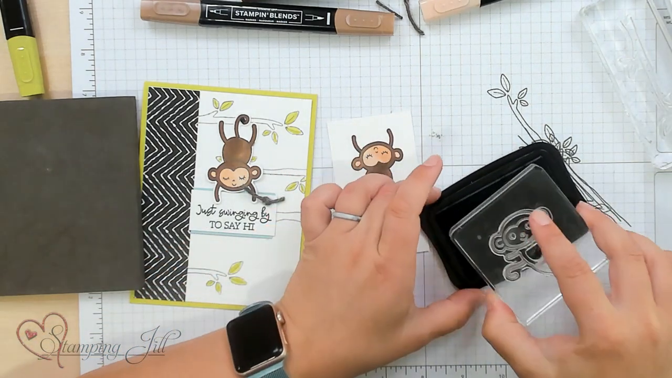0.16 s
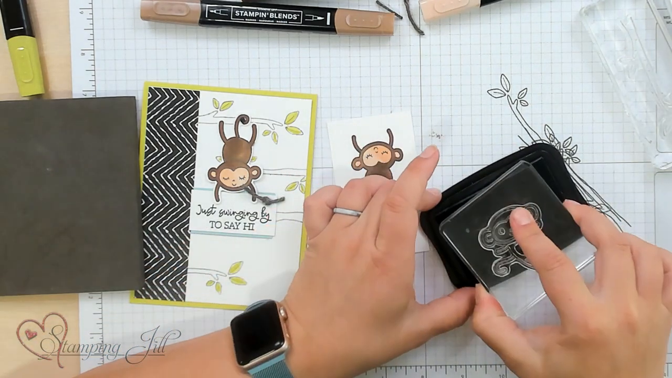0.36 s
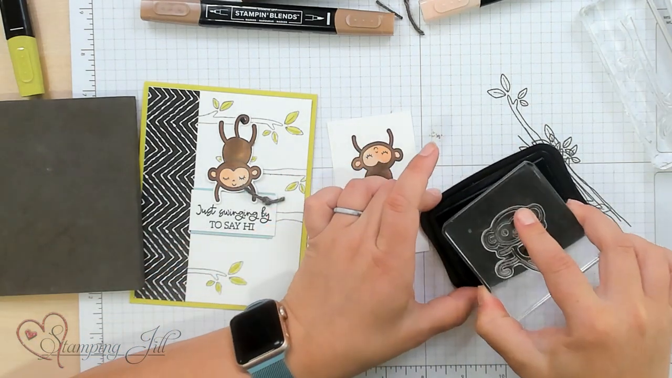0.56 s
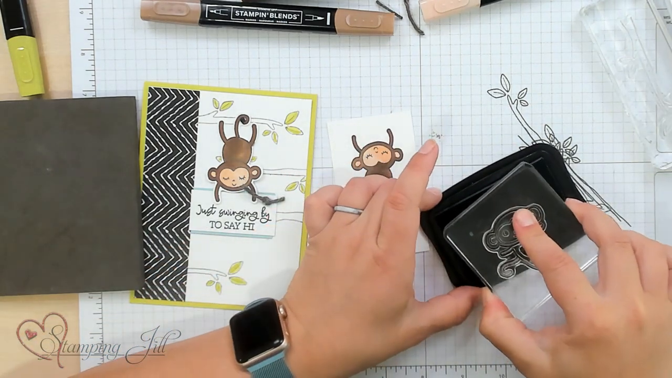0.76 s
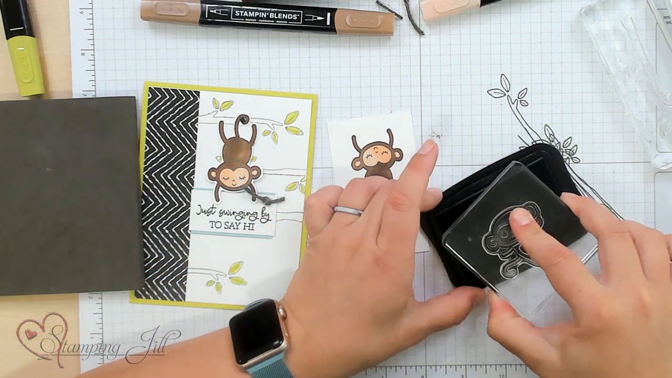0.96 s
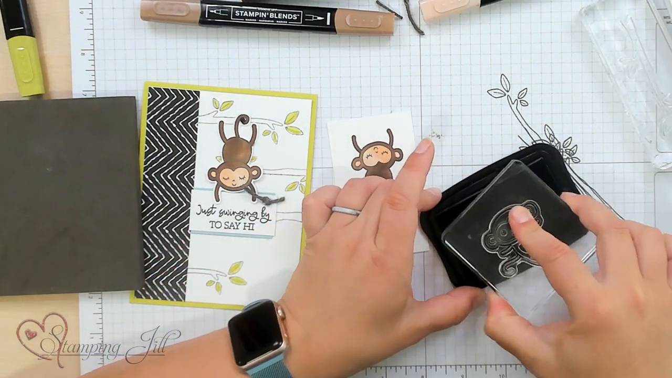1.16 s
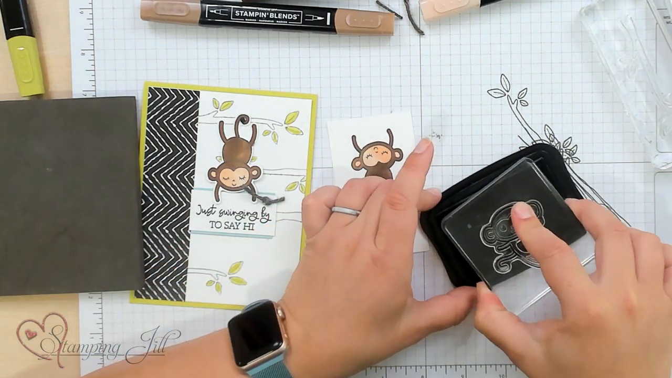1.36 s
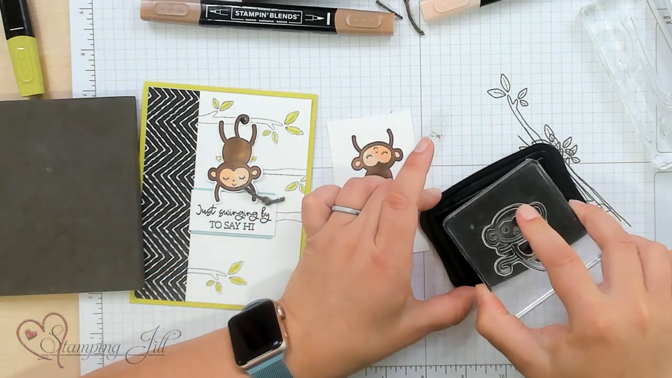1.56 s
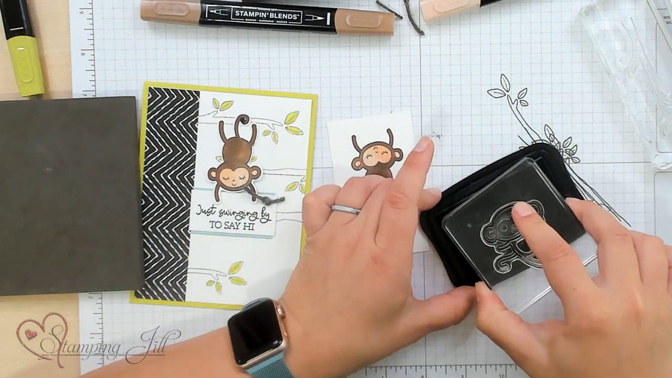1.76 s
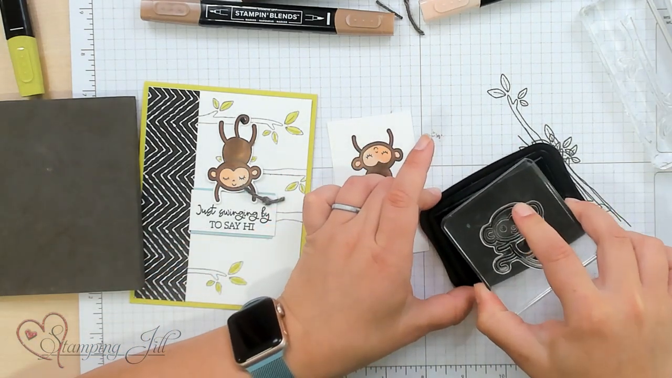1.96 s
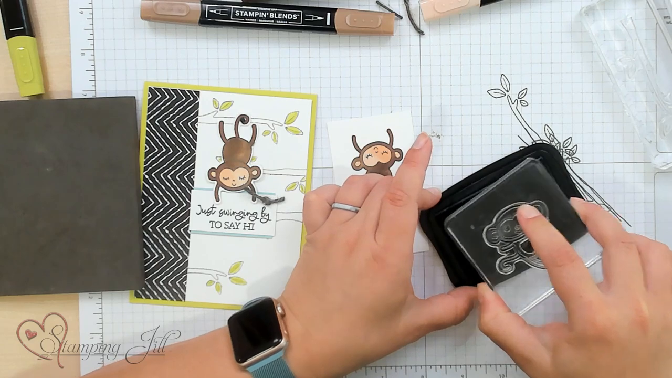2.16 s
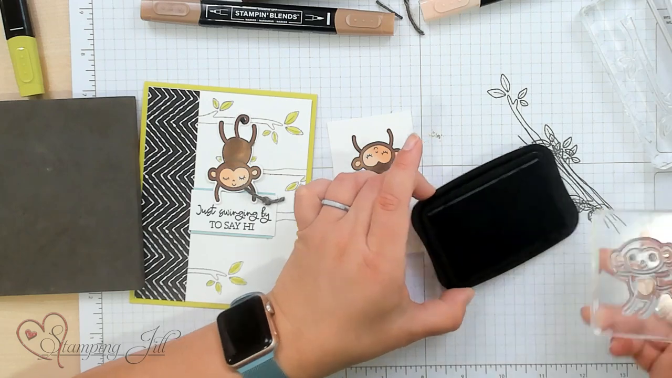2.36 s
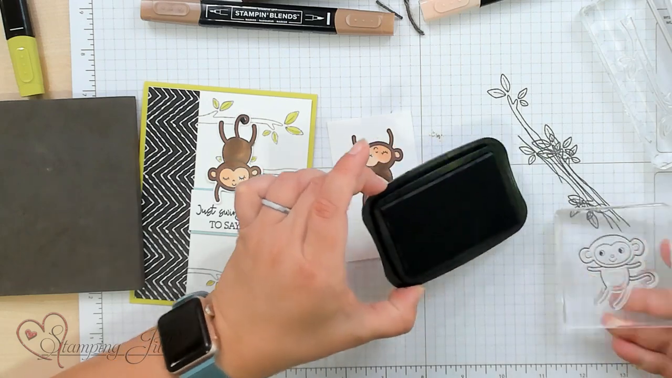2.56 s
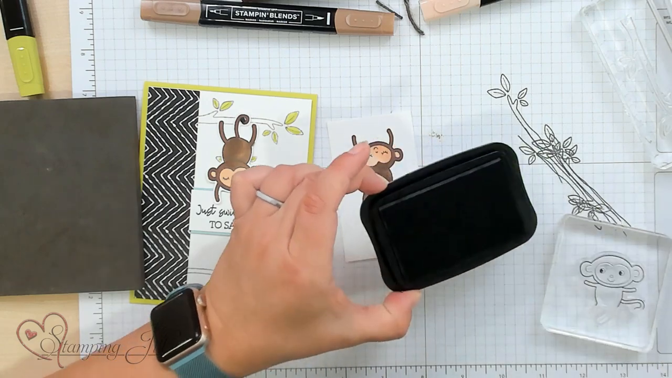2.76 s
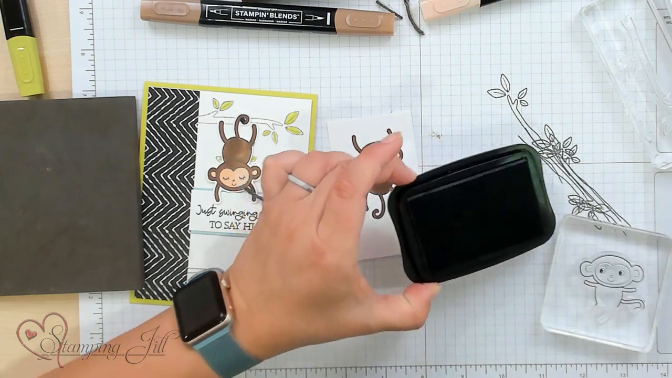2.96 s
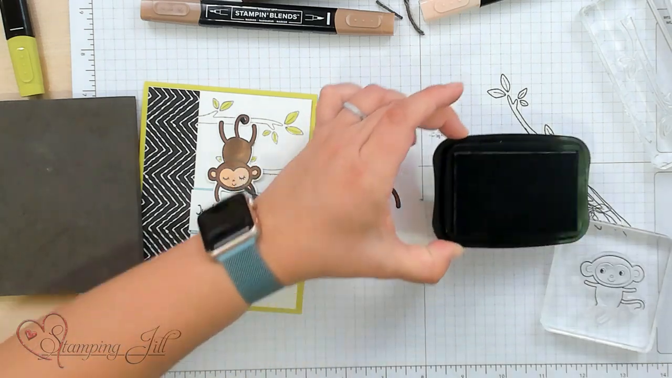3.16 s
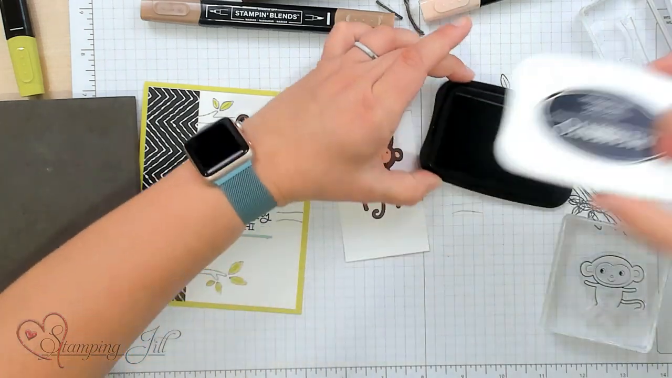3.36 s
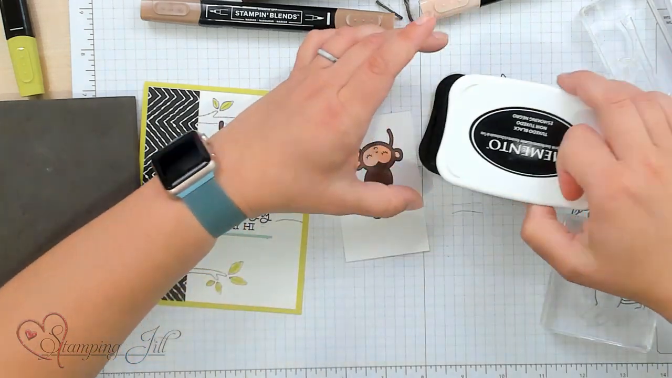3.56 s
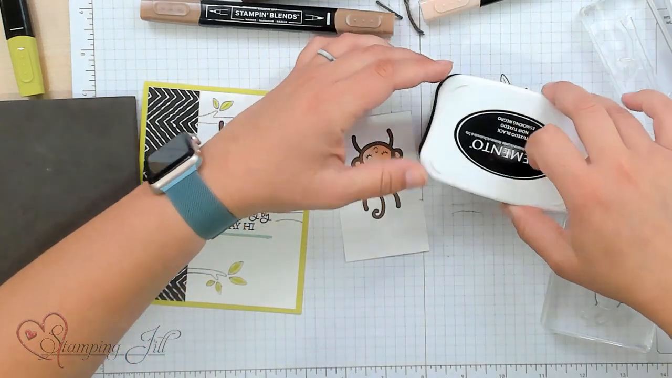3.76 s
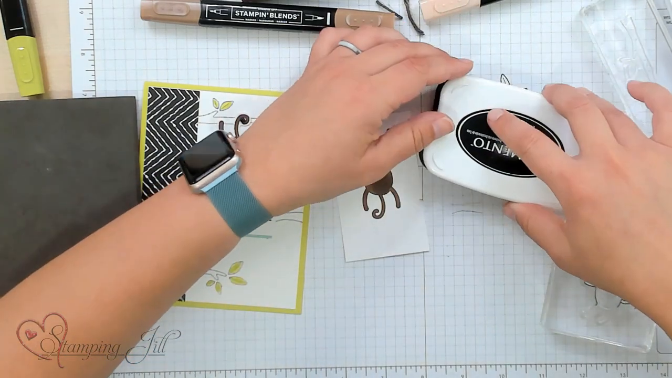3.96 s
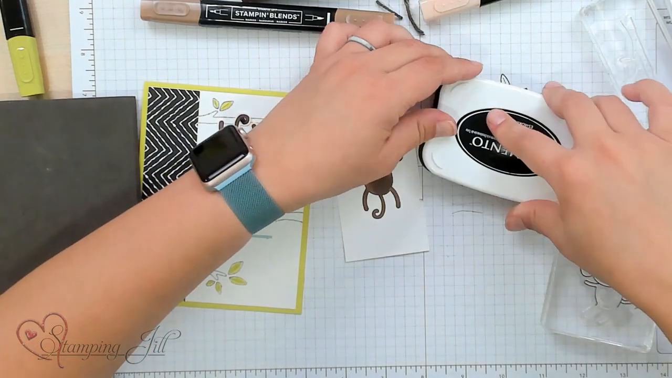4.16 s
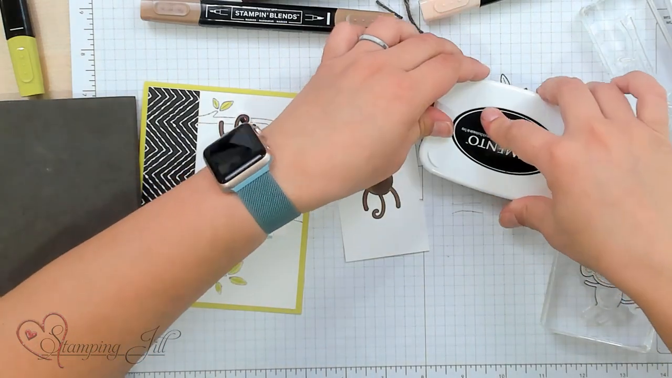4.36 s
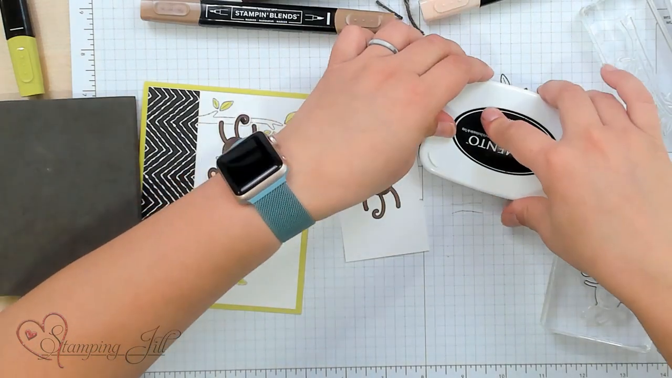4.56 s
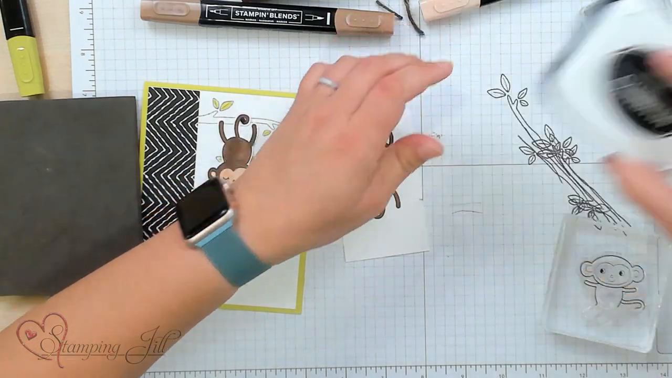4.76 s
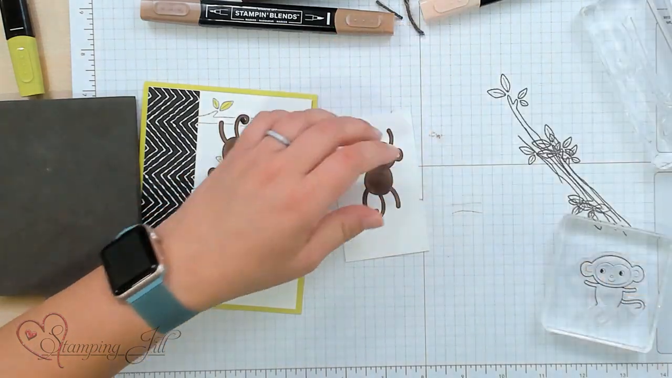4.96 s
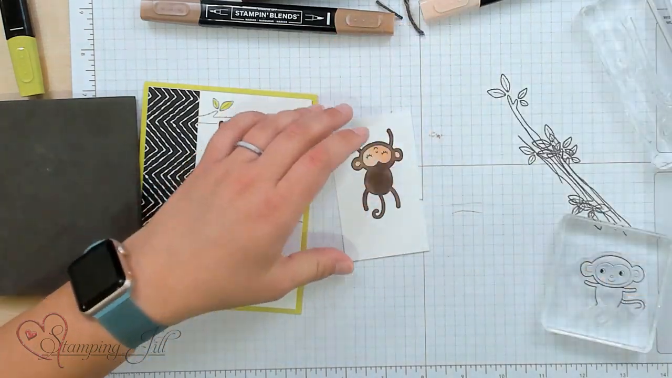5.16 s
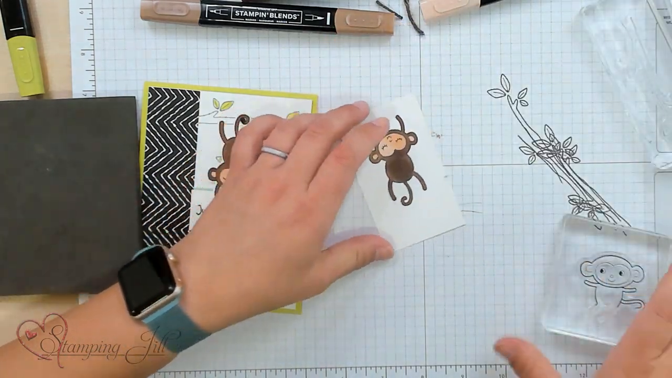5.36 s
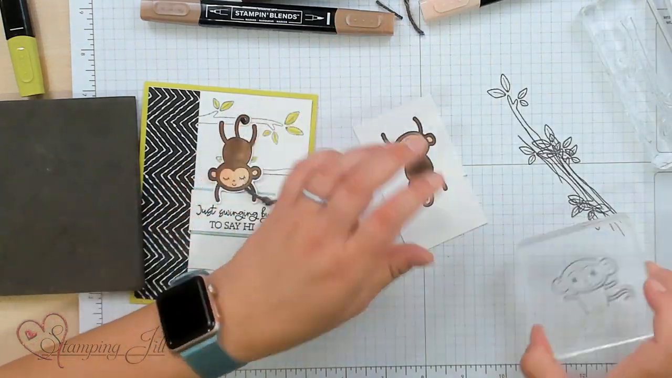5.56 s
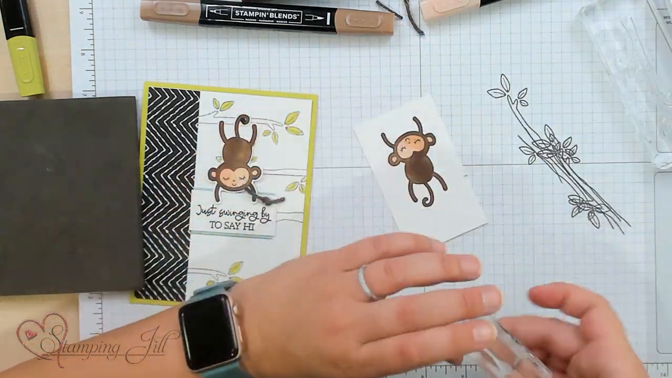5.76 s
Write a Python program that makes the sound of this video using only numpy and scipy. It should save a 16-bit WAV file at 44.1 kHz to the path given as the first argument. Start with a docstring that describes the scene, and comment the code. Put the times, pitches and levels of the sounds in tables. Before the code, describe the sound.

A small, quiet, slightly live room, heard from a microphone close above a desk. A steady, very soft low air rush with a barely noticeable fan whine runs throughout. Faint hand sliding opens the scene, with a weak low bump near 0.4 s. A clear stamp block knocks short and hollow on an ink pad at 0.7 s and again at 1.7 s, with near silence between. At 2.5 and 2.8 s it thuds onto the desk, woody and dull. From 3.0 to 3.5 s come light plastic ticks, scuffs and small knocks over skin rustle as the lid is fetched. A crisp, bright click at 4.1 s seats the lid; at 4.4 s it snaps shut with a loud crack and hollow pop, the loudest event. Tiny taps follow, then at 5.1 s the pad is put aside with a rapid six-contact plastic rattle lasting a tenth of a second. Soft brushing and a faint tap close at about 5.5 s.

```python
"""In a small quiet room, steady air rush (filtered noise) and sliding hands (grainy noise) are heard first.
A clear stamp block is pressed twice on an ink pad and laid on the desk: edge ticks (noise bursts shaped by
thin plastic) and blows (damped desk and hollow-plastic modes). The plastic lid is fetched, seated and snapped
shut: rims ring in shell modes, and a run of bursts cracks while the case swells into a modal pop. The pad is
put aside and rattles to rest in further damped modes; hands brush over paper and plastic in between."""
import sys
import numpy as np
from scipy import signal
from scipy.fft import rfft, irfft, next_fast_len
from scipy.io import wavfile
from scipy.ndimage import uniform_filter1d, map_coordinates

SR = 44100
rng = np.random.default_rng(int(sys.argv[2]) if len(sys.argv) > 2 else 0)


def store_wav(level_fs):
    """Save 16-bit WAV to argv[1]."""
    pcm = np.round(np.clip(np.atleast_2d(level_fs), -1, 1) * 32767)
    wavfile.write(sys.argv[1], SR, pcm.T.astype(np.int16))


N = 256662
T = np.arange(SR // 2) / SR  # time since a blow (s)
TOP_HZ = 15900  # upper band limit

# Room air spectrum. Each row: frequency in Hz, relative level in dB.
AIR_SPECTRUM = [(15, -24.5), (25, -1.5), (119, -2.5), (156, -2), (204, -6.5), (305, -6), (389, -10.5),
                (537, -12.5), (762, -15), (945, -14), (1200, -20), (1490, -23.5), (2230, -28), (10600, -37),
                (15500, -43.5)]
# Nominal reverberation decay. Each row: frequency in Hz, time to fall 60 dB in s.
ROOM_T60 = [(100, 0.18), (500, 0.38), (1000, .25), (5500, 0.24), (10000, 0.17), (16000, 0.064)]
# Spectral balance of the reverberation. Each row: frequency in Hz, relative level in dB.
ROOM_COLOUR = [(60, -2), (200, 9), (500, -1.5), (1500, 2), (3500, -1), (5500, -1), (9000, -0.5), (16000, 0)]
# Resonances of thin plastic walls. Each row: frequency in Hz, width in Hz, peak in dB over a gain of 1.
PLASTIC_WALLS = [(1160, 540, 5), (1870, 420, 0.5), (2230, 70, 3), (3300, 300, -11), (4000, 120, -6),
                 (4700, 350, -6), (5140, 55, -5), (5700, 100, -4.5), (9150, 180, -2)]

# Skin and paper sliding. Each row: middle in s, length in s, level in dB, band centre in Hz.
RUBS = [(0.13, 0.42, -81, 7500), (0.827, 0.17, -79.5, 6500), (2.415, 0.1, -68.5, 10600),
        (2.696, 0.64, -75.5, 6000), (3.093, 0.37, -76, 6700), (3.39, 0.23, -72.5, 7500),
        (3.763, 0.18, -80.5, 4400), (4.338, 0.15, -75.5, 3740), (4.716, 0.32, -75.5, 3200),
        (5.345, 0.18, -73, 7600), (5.518, 0.45, -75, 4300)]
# Hand-held plastic scuffing along an edge. Each row: middle in s, length in s, level in dB, pitch in Hz.
SCUFFS = [(0.077, 0.08, -67, 2150), (3.111, 0.032, -59.5, 2340)]
# Small catches of a sliding finger: rate, mean level over the rub level, spread.
GRIT_PER_S, GRIT_DB, GRIT_SPREAD_DB = 29, 6.5, 4
CLUMP_S, CLUMP_DB = .007, 2.5  # stick and slip of skin: length of a patch, swing in level
SKIN_TOP_HZ = 12900  # soft skin makes little hiss above this
RUB_BODY_DB, RUB_BODY_HZ = 1, 696  # sheet and desk rustling under the hand: level over the hiss, band centre

# Plastic edges catching in the hand. Each row: start in s, level in dB, band centre in Hz, 60 dB decay in s.
CLICKS = [(.1416, -56.5, 7450, 0.012), (0.6453, -60.5, 7100, 0.0081), (1.899, -62, 5800, 0.021),
          (2.9847, -52.5, 10000, 0.016), (3.1063, -47, 4650, 0.0091), (3.111, -51, 10000, 0.038),
          (3.14, -46, 1730, 0.015), (3.2997, -41, 9470, 0.014), (3.407, -49.5, 11700, 0.011),
          (3.526, -57, 3800, 0.014), (3.799, -56, 6950, 0.0093), (4.0771, -35, 2600, 0.019),
          (4.080, -21, 4000, 0.0057), (4.086, -36, 1280, 0.018), (4.617, -60, 3800, 0.011),
          (4.874, -57.5, 2400, 0.011)]

# Block or pad set down. Each row: blow in s, desk level in dB, contact length in s, hollow knock level in dB,
# knock pitch in Hz, edge tick level in dB, tick band centre in Hz, lead of the tick before the blow in s.
THUMPS = [(0.381, -39, 0.006, -58, 584, -56, 800, 0.0094),
          (0.713, -32, 0.00059, -25.5, 603, -50.5, 2830, 0.002),
          (1.701, -32.5, 0.00072, -30, 614, -52.5, 1300, 0.00043),
          (2.544, -29.5, 0.0014, -32.5, 540, -56.5, 3400, 0.0073),
          (2.703, -50, 0.0015, -47.5, 696, -52, 3630, 0.001), (2.768, -27, 0.0016, -29, 596, -49, 1660, 0),
          (3.134, -52, 0.0013, -44.5, 682, -39, 1470, 0.0014),
          (3.299, -52.5, 0.0017, -47, 741, -39.5, 2720, 0.00067),
          (3.407, -42.5, 0.0013, -34, 618, -48.5, 2350, 0),
          (3.502, -47, 0.0013, -39.5, 565, -50, 4300, 0.00053),
          (4.132, -48.5, 0.0022, -30.5, 569, -44, 2110, 0.0053),
          (4.268, -57, 0.0033, -54, 649, -69.5, 1204, 0),
          (4.852, -54.5, 0.0023, -48, 734, -57, 3300, 0.0021),
          (4.926, -46.5, 0.0013, -57, 520, -58.5, 3000, 0.0015),
          (5.544, -54, 0.0027, -64.5, 595, -53.5, 2500, 0.0097)]
# Modes of the desk. Each row: frequency in Hz, relative level in dB, 60 dB decay in s.
DESK_MODES = [(54.4, -13.5, 0.21), (112, 1.5, 0.08), (145, 1.5, .09), (192.2, -5.5, 0.047),
              (255.1, -0.5, 0.057), (352, -3, 0.0297)]
# Modes of the hollow plastic. Each row: multiple of the knock pitch, relative level in dB, 60 dB decay in s.
HOLLOW_MODES = [(.66, -10.5, .022), (.84, -1.5, 0.039), (1, 5.5, 0.036), (1.17, -28, 0.022),
                (2.25, -21.5, 0.016)]
EDGE_T60_S = 0.0124  # decay of an edge's tick

# Hard knocks on the rim of the tray. Each row: start in s, ring level in dB, air push level in dB.
TRAY_KNOCKS = [(3.299, -53, -47.5), (4.414, -39.5, -47)]
# Modes of the open tray. Each row: frequency in Hz, relative level in dB, 60 dB decay in s.
TRAY_MODES = [(2290, 0.5, 0.12), (3250, -1.5, 0.089), (4780, -12, 0.16), (6310, -9.5, 0.12),
              (10400, 11, 0.0097)]
# Hard knocks on the rim of the lid. Each row: start in s, ring level in dB, air push level in dB.
LID_KNOCKS = [(4.078, -44, -50), (4.080, -40, -48), (4.4195, -39, -56.5)]
# Modes of the loose lid. Each row: frequency in Hz, relative level in dB, 60 dB decay in s.
LID_MODES = [(382, 3.5, 0.024), (656, 4, 0.037), (1194, 11, 0.016), (1264, 2, 0.073), (3596, 7, 0.018),
             (3870, -0.5, 0.046), (4220, -1, .06)]

SNAP_AT = 4.4115  # the lid begins to snap shut (s)
# The rim slips over its catches. Each row: time after the start of the snap in s, relative level in dB.
CATCHES = [(0, -18.5), (.0024, -18), (.0045, -20.5), (.0068, -24)]
# Spectrum of the crack. Each row: frequency in Hz, relative level in dB.
CRACK_SPECTRUM = [(300, 6.5), (1000, 0), (2500, 4), (4300, 7), (7000, 5.5), (11000, -4), (16000, -6.5)]
# Modes of the closing case. Each row: frequency in Hz, relative level in dB, 60 dB decay in s.
CASE_MODES = [(48, -3.5, 0.023), (110, -15, 0.066), (149, -18.5, 0.053), (292, -19.5, 0.096),
              (408, -7.5, 0.028), (417.2, -1.5, 0.034), (662, -2.5, .032), (708, -6, 0.037),
              (860, -17, 0.046)]

# The pad rocks on the surface beside the work.
# Each row: contact in s, ring level in dB, thud level in dB, edge tick level in dB.
RATTLE = [(5.080, -35.5, -40, -36.5), (5.100, -43, -68, -40.5), (5.1204, -35.5, -64, -42.5),
          (5.146, -30, -42.5, -32), (5.1644, -31, -71, -36.5), (5.180, -42, -58, -49.5)]
# Modes heard as the pad rocks. Each row: frequency in Hz, relative level in dB, 60 dB decay in s.
SHELF_MODES = [(574, -18, 0.093), (723, -6, 0.093), (786, 5.5, 0.035), (895, 2.5, 0.036), (970, -2, 0.064),
               (1085, -19, 0.11), (1460, -31, 0.026), (1636, -19, 0.11), (2240, -42, .04)]
EDGE_LEAD_S = .001  # a rocking edge touches this early
ROCK_TICK_HZ, ROCK_T60_S = 2240, 0.027  # its edge at every contact
CORNER_DB, CORNER_HZ, CORNER_T60_S = -32.5, 7980, .013  # the sharp corner that lands first


def amp(db):
    """Logarithmic level: decibels become an amplitude ratio."""
    return 10 ** (np.asarray(db) / 20)


def unit(x):
    """Normalisation: the root mean square becomes 1."""
    return x / np.sqrt(np.mean(x ** 2) + 1e-20)


def along(points, hz):
    """Logarithmic frequency scale: interpolate (Hz, value) points along it."""
    f, v = np.transpose(points)
    return np.interp(np.log(hz + 1), np.log(f), v)


def fade(t60):
    """Exponential damping: amplitude falls by 60 dB in t60 seconds."""
    return np.exp(-np.log(1000) * T / t60)


def add(track, s, sound):
    """Superposition: mix a sound in at s seconds, or at zero if that is earlier."""
    start = max(round(s * SR), 0)
    part = track[start:start + len(sound)]
    part += sound[:len(part)]


def coloured(x, gain):
    """Minimum-phase filtering: a causal response of unit power follows the given gain over frequency."""
    m = 2 * next_fast_len(len(x))
    magnitude = unit(gain(np.fft.rfftfreq(m, 1 / SR)))
    cepstrum = irfft(np.log(np.maximum(magnitude, 1e-6)))
    # folding the cepstrum onto positive time makes the filter causal
    cepstrum[1:m // 2] *= 2
    cepstrum[m // 2 + 1:] = 0
    response = np.exp(rfft(cepstrum))
    return irfft(rfft(x, m) * response, m)[:len(x)]


def hump(hz, centre_hz, q):
    """Simple resonance: gain is greatest at the centre and narrower for larger q."""
    return 1 / np.hypot(1, q * ((hz + 1) / centre_hz - centre_hz / (hz + 1)))


def walls(hz):
    """Wall resonance: thin plastic adds narrow peaks to a flat gain."""
    return 1 + sum(amp(db) / (1 + (2 * (hz - f) / width) ** 2) for f, width, db in PLASTIC_WALLS)


def ring(modes, attack, pitch=1):
    """Modal vibration: damped sines of slightly varied strength build up over a yielding contact."""
    tone = np.zeros(len(T))
    for f, db, t60 in modes:
        strength = amp(db + rng.standard_normal() / 2)
        tone += strength * fade(t60) * np.sin(2 * np.pi * pitch * f * T)
    return tone * (1 - np.exp(-(T / attack) ** 2))


def room_tail(onset=0.0039):
    """Diffuse reverberation: decaying noise of unit energy, drawn anew for each use."""
    hz, t, bands = signal.stft(rng.standard_normal(len(T)), SR, nperseg=256)
    bands = bands * np.exp(-np.log(1000) * t / along(ROOM_T60, hz)[:, None])
    build_up = 1 - np.exp(-(T / onset) ** 2)
    decaying = signal.istft(bands, SR, nperseg=256)[1][:len(T)]
    spectrum = rfft(decaying * build_up)
    # many overlapping modes spread the energy evenly over frequency
    spectrum /= np.sqrt(np.abs(uniform_filter1d(np.abs(spectrum) ** 2, size=30)) + 1e-20)
    tail = irfft(spectrum * amp(along(ROOM_COLOUR, np.fft.rfftfreq(len(T), 1 / SR))), len(T))
    tail *= build_up * (T < T[-1] * 2 / 3)
    return tail / np.linalg.norm(tail)


def in_room(x, wet_db):
    """Reflection: the direct sound is followed by reverberation after the path to the nearest wall."""
    wall_delay = round(.008 * SR)
    reverberation = signal.fftconvolve(x, np.pad(room_tail(), (wall_delay, 0)))[:len(x)]
    return x + amp(wet_db) * reverberation


def crackle(t60, wet_db, attack=0.00044):
    """Random impacts: a dying burst of tiny contacts leaves a smooth wash in the room."""
    burst = rng.standard_normal(len(T)) * fade(t60) * (1 - np.exp(-T / attack))
    return burst + amp(wet_db) * np.linalg.norm(burst) * room_tail()


def tick(centre_hz, t60):
    """Broadband impact: a hard edge touches, and its noise burst is coloured by the plastic walls."""
    return coloured(crackle(t60, wet_db=-9), lambda hz: hump(hz, centre_hz, q=0.62) ** 2 * walls(hz))


def room_air():
    """Stationary noise: a steady low rush with a narrow band as a faint, fuzzy fan whine."""
    rush = unit(coloured(rng.standard_normal(N), lambda hz: amp(along(AIR_SPECTRUM, hz))))
    whine = unit(coloured(rng.standard_normal(N), lambda hz: hump(hz, 1462, q=35)))
    return amp(-67.5) * rush + amp(-86.5) * whine


def stroke(length, centre_hz, q):
    """Friction noise: a grainy, uneven hiss swells and dies, gathered around one pitch."""
    n = max(int(length * SR), 2)
    patch = np.arange(n) / (CLUMP_S * SR)
    clumps = map_coordinates(rng.standard_normal(SR // 100), [patch], mode="wrap")
    noise, sizes = rng.standard_normal((2, SR))[:, :n]
    grains = unit(noise * amp(2.7 * sizes + CLUMP_DB * clumps))

    def colour(hz):
        return hump(hz, centre_hz, q) ** 2 / np.hypot(1, (hz / SKIN_TOP_HZ) ** 3)

    return coloured(grains * np.hanning(n), colour)


def rubs():
    """Sliding friction: skin and paper give a broad hiss and tiny catches, plastic a narrow scuff."""
    out, grit = np.zeros(N), np.zeros(N)
    for s, length, db, centre_hz in RUBS:
        hiss = stroke(length, centre_hz, q=0.37)
        body = stroke(length, RUB_BODY_HZ, q=0.44)
        add(out, s - length / 2, amp(db) * (hiss + amp(RUB_BODY_DB) * body))
        for when, size in rng.standard_normal((round(GRIT_PER_S * length), 2)):
            catch_at = s + np.tanh(when) * length / 2
            catch_db = db + GRIT_DB + GRIT_SPREAD_DB * size
            add(grit, catch_at, amp(catch_db) * tick(centre_hz, EDGE_T60_S))
    for s, length, db, pitch_hz in SCUFFS:
        add(out, s - length / 2, amp(db) * stroke(length, pitch_hz, q=1.35))
    return in_room(out, wet_db=-13.0) + grit


def clicks():
    """Edge impact: block, pad and lid click as they are gripped and fitted together."""
    out = np.zeros(N)
    for s, db, centre_hz, t60 in CLICKS:
        add(out, s, amp(db) * tick(centre_hz, t60))
    return out


def desk_boom(contact):
    """Contact duration: a longer push on the desk wakes only its lowest modes."""
    radiation = signal.butter(2, 75, "highpass", fs=SR)  # air slips round the board at the lowest pitches
    push = np.hanning(max(int(contact * SR), 3))
    pushed = np.convolve(ring(DESK_MODES, attack=0.00109), push / push.sum())[:len(T)]
    return in_room(signal.lfilter(*radiation, pushed), wet_db=-17.0)


def thumps():
    """Coupled impact: an edge ticks, then desk and hollow plastic ring with a dull slap of flat faces."""
    out = np.zeros(N)
    for s, desk_db, contact, knock_db, pitch_hz, tick_db, tick_hz, lead in THUMPS:
        knock = in_room(ring(HOLLOW_MODES, attack=0.00148, pitch=pitch_hz), wet_db=-18)
        slap = coloured(crackle(t60=.02, wet_db=-2.0), lambda hz: hump(hz, .8 * pitch_hz, q=0.624) ** 3)
        add(out, s - lead, amp(tick_db) * tick(tick_hz, EDGE_T60_S))
        add(out, s, amp(desk_db) * desk_boom(contact))
        add(out, s, amp(knock_db) * (knock + amp(-12) * slap))
    return out


def rim_knocks(knocks, modes):
    """Shell vibration: a knock on the rim rings the whole shell, whose flexing face pushes a little air."""
    out = np.zeros(N)
    for s, ring_db, push_db in knocks:
        push = ring([(43.4, 1.5, 0.15), (130, -6, 0.041)], attack=0.00062)
        shell = in_room(ring(modes, attack=0.00029), wet_db=-15.5)
        add(out, s, amp(ring_db) * shell + amp(push_db) * push)
    return out


def lid_snap():
    """Snap fit: the rim cracks over its catches while the closing case swells into a hollow pop."""
    out, crack = np.zeros(N), np.zeros(len(T))
    for delay, db in CATCHES:
        add(crack, delay, amp(db) * crackle(t60=0.015, wet_db=-7.5))
    add(out, SNAP_AT, coloured(crack, lambda hz: amp(along(CRACK_SPECTRUM, hz)) * walls(hz)))
    pop = in_room(ring(CASE_MODES, attack=0.0037), wet_db=-18.5)
    add(out, SNAP_AT + .0015, amp(-4) * pop)
    return out


def put_aside():
    """Repeated impact: the pad lands on a corner and rocks; edge ticks and lid chatter mark each contact."""
    out = np.zeros(N)
    add(out, RATTLE[0][0] - EDGE_LEAD_S, amp(CORNER_DB) * tick(CORNER_HZ, CORNER_T60_S))
    for s, ring_db, thud_db, tick_db in RATTLE:
        chatter = coloured(crackle(t60=0.046, wet_db=-5.0), lambda hz: hump(hz, 880, q=2.2) ** 2)
        clack = in_room(ring(SHELF_MODES, attack=0.0011), wet_db=-15.0) + amp(-3) * chatter
        thud = ring([(42.0, 3, 0.063), (152.0, -3, 0.043)], attack=0.0004)
        add(out, s - EDGE_LEAD_S, amp(tick_db) * tick(ROCK_TICK_HZ, ROCK_T60_S))
        add(out, s, amp(ring_db) * clack + amp(thud_db) * thud)
    return out


def scene():
    """Superposition: all sources add at one microphone above the desk."""
    shells = rim_knocks(TRAY_KNOCKS, TRAY_MODES) + rim_knocks(LID_KNOCKS, LID_MODES)
    mix = room_air() + rubs() + clicks() + thumps() + shells + lid_snap() + put_aside()
    return mix[None]


def record(dry):
    """Band limiting: the recorder keeps nothing from its top frequency upward."""
    m = next_fast_len(N + SR // 2)
    passband = np.fft.rfftfreq(m, 1 / SR) < TOP_HZ
    return irfft(rfft(dry, m) * passband, m)[:, :N]


dry = scene()
out = record(dry)
store_wav(out)
```